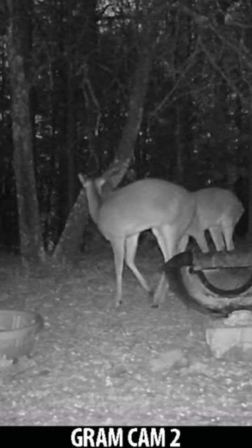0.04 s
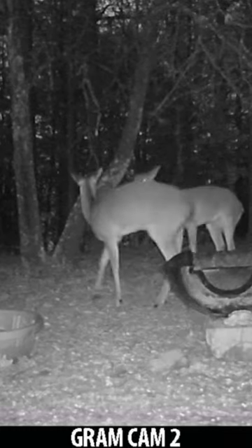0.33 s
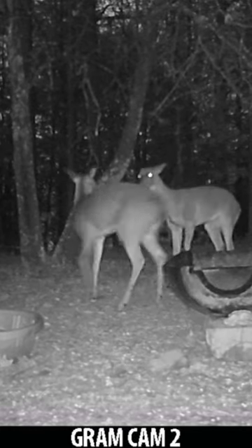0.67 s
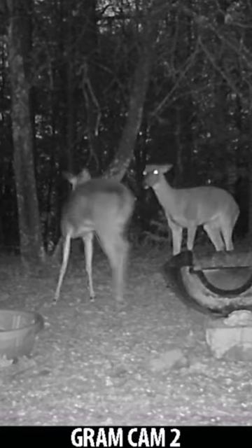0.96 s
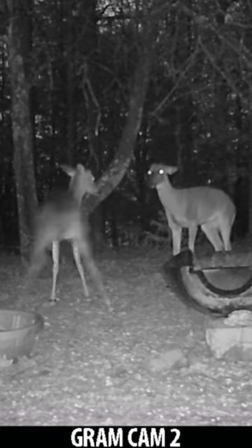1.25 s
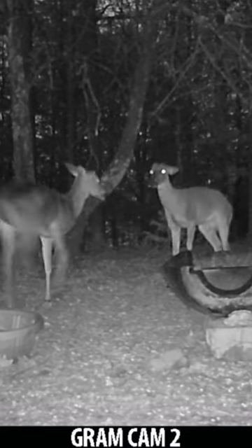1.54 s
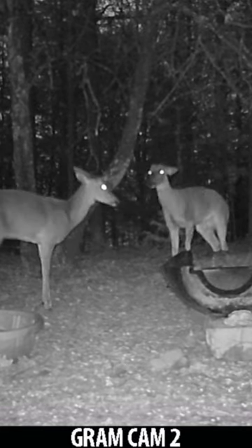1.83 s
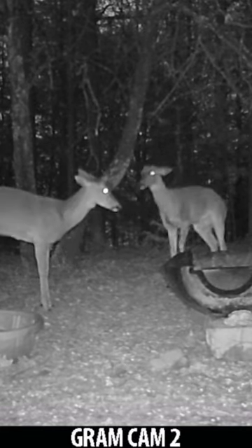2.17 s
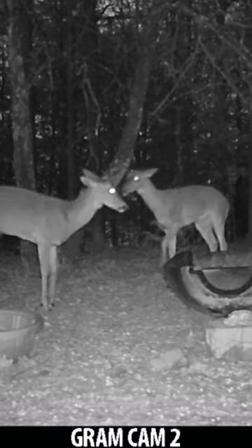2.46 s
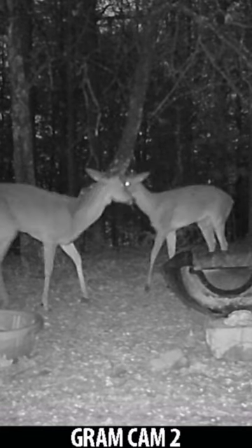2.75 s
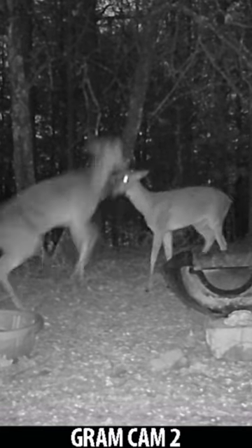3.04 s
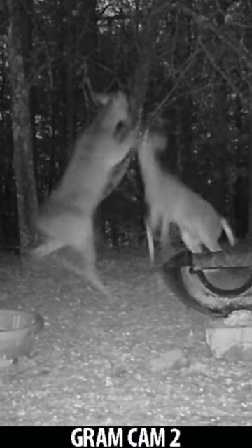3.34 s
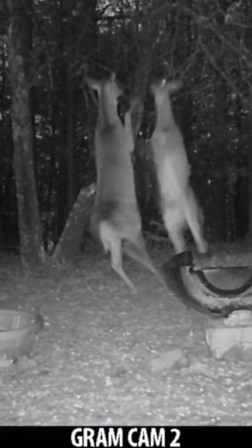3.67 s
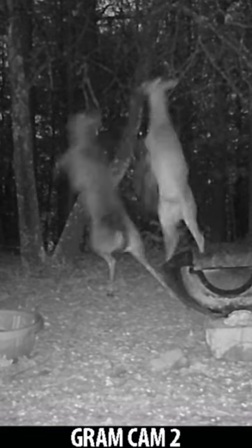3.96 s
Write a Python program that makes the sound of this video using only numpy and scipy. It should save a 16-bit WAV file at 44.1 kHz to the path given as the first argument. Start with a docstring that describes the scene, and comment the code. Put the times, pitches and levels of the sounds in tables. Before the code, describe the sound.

Two deer step about in the woods with dull hoof thumps, pause briefly, then move again. Leaf litter scuffs and twigs snap before their legs knock together in sharp clacks, over a quiet low rumble and thin hiss.

```python
"""Deer boxing at night

Two deer shuffle on leaf-strewn earth, then rear up and box with their front legs. Hooves thud on the
soft ground and scuff the litter; the blows excite damped resonances, sharp clacks that echo among the
trees. Behind them are a low rumble, a wavering drone, a faint flutter, and the hiss, whine and ticking
buzz of a small camera."""
import sys
import numpy as np
from scipy import signal
from scipy.fft import rfft, irfft
from scipy.io import wavfile

SR = 44100
rng = np.random.default_rng(int(sys.argv[2]) if len(sys.argv) > 2 else 0)


def int16_out(signal):
    """Quantize to a 16-bit WAV file."""
    q = np.round(np.clip(np.atleast_2d(signal).T, -1, 1) * 32767)
    wavfile.write(sys.argv[1], SR, q.astype(np.int16))


N = 176400
T = np.arange(N) / SR
TREBLE_ABOVE_HZ, BLOW_CUTOFF_HZ = 1700, 3700


def from_db(db):
    """Amplitude grows tenfold for every 20 dB."""
    return 10 ** (np.asarray(db) / 20)


def rms_one(x):
    """Normalisation to unit rms."""
    return x / np.sqrt(np.mean(x ** 2) + 1e-20)


def in_time(rows):
    """Linear interpolation of each column against the first, time."""
    s, *columns = np.transpose(rows)
    return [np.interp(T, s, c) for c in columns]


def lowpass(x, hz, order=2):
    """A Butterworth filter attenuates the treble."""
    return signal.sosfilt(signal.butter(order, min(hz, .45 * SR), fs=SR, output="sos"), x + 1e-18)


def noise():
    """White noise has a flat mean spectrum."""
    return rng.standard_normal(N)


def wander(hz):
    """Low-passed noise gives a random fluctuation of unit rms."""
    return rms_one(lowpass(noise(), hz))


def colour(x, spectrum):
    """Spectral shaping by rows of frequency in Hz and gain in dB, normalised to unit rms."""
    hz, db = np.transpose(spectrum)
    f = np.maximum(np.arange(N // 2 + 1) * SR / N, 1)
    gain = from_db(np.interp(np.log(f), np.log(hz), db))
    return rms_one(irfft(rfft(x) * gain, N))


def ring(x, hz, t60):
    """A damped resonator answers an impulse with a sine that falls 60 dB in t60 seconds."""
    r, w = np.exp(-np.log(1000) / (t60 * SR)), 2 * np.pi * hz / SR
    return signal.lfilter([0, np.sin(w)], [1, -2 * r * np.cos(w), r * r], x + 1e-18)


def click(s):
    """A unit impulse at s seconds."""
    return 1.0 * (np.arange(N) == int(s * SR))


def swell(s, rise, fall):
    """Exponential growth to 1 at s seconds, then exponential decay."""
    return np.exp(-np.minimum(np.maximum((s - T) / rise, (T - s) / fall), 20))


def rumble_and_hiss():
    """Stationary broadband noise: the night air rumbles and the camera hisses."""
    # Each row of both: frequency in Hz, relative level in dB.
    rumble = [(15, -3.5), (50, 2.5), (75, 0), (130, -10.5), (190, -13.5), (260, -17), (400, -31.5),
              (700, -32), (1500, -56)]
    hiss = [(300, -19), (800, 6), (1200, 1), (1700, -7.5), (2700, -2), (3400, -11.5), (4200, -16.5),
            (10000, -24), (15000, -34)]
    return from_db(-37.5) * colour(noise(), rumble) + from_db(-61.5) * colour(noise(), hiss)


def drone():
    """Random frequency and amplitude modulation make a low, distant tone waver."""
    # Each row: time in seconds, centre frequency in Hz, mean level in dB.
    course = [(0, 156.7, -39), (.38, 161.9, -34), (.55, 151.9, -63.5), (.85, 153.3, -33), (1.1, 155.6, -56),
              (1.33, 143, -29.5), (1.5, 125, -36.5), (1.75, 155.2, -42), (1.9, 138, -40),
              (2.0, 91.67, -50.5), (2.17, 99.9, -35.5), (2.4, 140, -42), (2.62, 155.2, -52),
              (2.85, 149.6, -39.5), (3.03, 154.5, -38), (3.3, 96.5, -37), (3.6, 150.5, -43.5),
              (4, 82.5, -71)]
    hz, db = in_time(course)
    hz = hz * (1 + .0488 * wander(17.4))
    return from_db(db + 2 * wander(13.5)) * np.sin(2 * np.pi * np.cumsum(hz) / SR)


def flutter():
    """Amplitude modulation by loosely periodic pulses breaks noise into faint, rasping puffs."""
    # Each row: time in seconds, mean pulses per second, level in dB.
    course = [(.45, 45.4, -67), (.85, 50.6, -61.5), (1.1, 76, -65), (1.62, 61, -56.5), (1.98, 43, -60.5),
              (2.15, 46, -69), (2.5, 50, -71.5), (2.8, 57, -64), (4, 50, -49)]
    rate, db = in_time(course)
    cycles = np.cumsum(rate * (1 + .13 * wander(25))) / SR
    decay_s = .0088
    puffs = np.exp(-(cycles % 1) / rate / decay_s)
    rasp = [(400, -60), (1250, 7), (1650, 0), (2100, 6), (3200, .5), (4200, -13.5), (15000, -47)]
    return from_db(db) * colour(noise() * puffs, rasp)


def whine():
    """A thin tone from the electronics climbs and settles; frequency jitter broadens its spectral line."""
    # Each row: time in seconds, centre frequency in Hz.
    glide = [(0, 13000), (.37, 13600), (.42, 14000), (.5, 14000), (1.05, 14400), (1.32, 15000),
             (2.0, 15000), (2.04, 15330), (2.1, 14890), (2.45, 15200)]
    hz, = in_time(glide)
    hz = hz + 80 * wander(20) + 145 * wander(400)
    return from_db(-70.5) * rms_one(np.sin(2 * np.pi * np.cumsum(hz) / SR))


def snaps():
    """Brittle fracture of single leaves and twigs releases brief broadband bursts."""
    # Each row: time in seconds, level in dB.
    breaks = [(.28, -52.5), (2.239, -48), (2.408, -46.5), (2.752, -48), (3.2294, -38), (3.282, -41),
              (3.4, -38), (3.638, -43), (3.686, -36.5)]
    # Each row: frequency in Hz, relative level in dB.
    spectrum = [(500, -1), (1600, 4.5), (3000, 1.5), (4500, -10), (7000, -19.5), (15000, -27)]
    return colour(noise(), spectrum) * sum(from_db(db) * swell(s, .00042, .0012) for s, db in breaks)


def scuffs():
    """Litter under a sliding hoof crackles as shot noise: loose leaves crisp, packed grit lower."""
    # Each row: peak time in seconds, level in dB, rise and fall in seconds, treble gain in dB.
    drags = [(0.409, -54.5, 0.031, 0.039, -0.5), (.6, -54.5, 0.016, 0.019, 5), (.985, -53.5, .017, 0.04, 3),
             (1.236, -44.5, 0.0072, 0.035, -1), (1.359, -47.5, 0.0018, 0.0075, 6.5),
             (1.396, -47, 0.0093, 0.029, 2.5), (2.667, -55.5, 0.016, 0.021, 5.5),
             (2.802, -44, 0.00068, 0.0064, -1.5), (2.84, -49, 0.03, 0.053, -3),
             (2.932, -45.5, 0.016, 0.048, -2.5), (3.155, -40, 0.0018, 0.014, 1.5),
             (3.188, -48.5, 0.0095, 0.029, 6), (3.244, -42, 0.013, 0.048, -3.5),
             (3.287, -42, 0.0042, 0.0065, 7.5), (3.365, -45.5, 0.0059, 0.0071, 0.5),
             (3.403, -48, 0.0099, .012, 5.5), (3.438, -26.5, .011, 0.0092, -3),
             (3.457, -43.5, 0.013, 0.057, -3), (3.592, -38.5, 0.0063, 0.021, -3),
             (3.637, -41.5, 0.0035, 0.024, 2.5), (3.689, -34.5, 0.0037, 0.0068, -15),
             (3.969, -40, 0.024, 0.061, -1.5)]
    # Each row: frequency in Hz, relative level in dB.
    litter = [(150, 6.5), (550, -12), (800, -4), (1100, 1), (1700, -4.5), (2200, 1), (2800, 0.5),
              (3500, -9), (4200, -17.5), (5500, -26.5), (15000, -52)]
    grains_per_s, spread_db = 5400, 3
    sizes = from_db(spread_db * np.minimum(rng.exponential(1, N), 4)) * rng.choice([-1, 1], N)
    grains = colour(sizes * (rng.random(N) < grains_per_s / SR), litter)
    grit = irfft(rfft(grains) * (np.arange(N // 2 + 1) * SR / N < TREBLE_ABOVE_HZ), N)
    leaves = grains - grit
    return sum(from_db(db) * swell(s, rise, fall) * (grit + from_db(crisp_db) * leaves)
               for s, db, rise, fall, crisp_db in drags)


def thuds():
    """A hoof compresses and releases soft earth; the shorter the pulse, the higher its spectrum."""
    # Each row: time in seconds, level in dB, characteristic frequency in Hz.
    footfalls = [(.571, -24.5, 203), (0.585, -19.5, 57), (.602, -14.5, 260), (0.605, -15.5, 63),
                 (0.6488, -23.5, 194), (.944, -12.5, 240), (0.948, -11, 244), (0.9632, -23, 145),
                 (0.982, -22, 225), (1.0112, -21, 146), (1.080, -12.5, 167), (1.1017, -27.5, 226),
                 (1.18, -17.5, 140), (1.193, -22.5, 144), (1.2828, -12.5, 152), (1.337, -17.5, 99),
                 (1.354, -18, 340), (1.358, -15.5, 250), (1.398, -19.5, 98), (1.4164, -10, 203),
                 (1.4246, -19.5, 189), (1.4349, -24.5, 218), (1.5328, -16, 122), (1.561, -21.5, 200),
                 (1.569, -15.5, 220.1), (1.6037, -17.5, 232.2), (2.277, -31.5, 140), (2.3692, -19, 148),
                 (2.465, -16.5, 102.8), (2.492, -26.5, 165), (2.539, -19.5, 53), (2.573, -17.5, 304),
                 (2.579, -10.5, 96), (2.6069, -19, 156), (2.6224, -21.5, 211.4), (2.636, -19, 111),
                 (2.671, -21, 140), (2.68, -18, 214), (2.6843, -16, 354), (2.7535, -15.5, 166),
                 (2.815, -26, 140), (2.8834, -18.5, 260), (2.894, -21, 283), (2.904, -21, 145),
                 (3.031, -19, 103), (3.0451, -18, 140), (3.3224, -21.5, 178), (3.337, -22, 166.1)]
    pulses, settling, shudder_power = np.zeros((3, N))
    settle_s = .014
    for s, db, hz in footfalls:
        u = (T - s) * np.pi * hz
        spread = 1 + u * u
        push = u * (4 - spread) / (spread * spread * spread)
        pulses += from_db(db) * lowpass(push, max(395, 2 * hz), order=3)  # sharp stamps are less muffled
        settling += from_db(db) * swell(s, settle_s / 3, settle_s)
        shudder_power += (from_db(db) * swell(s, .056, .097)) ** 2
    # Clods settle and the ground shudders with each step.
    clods = rms_one(lowpass(noise(), 285, order=3))
    shudder = colour(noise(), [(15, -15), (45, 0), (140, -2), (2000, -82)])
    return pulses + from_db(-20) * settling * clods + from_db(-18.5) * np.sqrt(shudder_power) * shudder


def ticking_buzz():
    """Narrow-band noise leaks from the electronics in faint periodic bursts."""
    first_s, period_s = .792, .8335
    bursts = sum(swell(s, .012, .012) for s in np.arange(first_s, T[-1], period_s))
    return from_db(-70) * bursts * rms_one(ring(noise(), hz=8900, t60=.006))


def creaks():
    """Stick-slip motion: a few evenly spaced slips each excite one high resonance."""
    # Each row: start in seconds, level in dB, resonance in Hz, number of slips.
    runs = [(1.696, -38.5, 3340, 2), (1.891, -43, 2010, 2), (3.739, -33, 2773, 5)]
    gap_s = .0113
    out = np.zeros(N)
    for s, db, hz, count in runs:
        slips = sum(click(s + k * gap_s) * from_db(rng.normal(0, 1.6)) for k in range(round(count)))
        out += from_db(db) * ring(slips, hz, t60=.014)
    return lowpass(out, BLOW_CUTOFF_HZ, order=8)


def clacks():
    """Impacts of legs and hooves excite heavily damped modes; hard blows favour the upper ones."""
    # Each row: time in seconds, level in dB, rattle decay in seconds, gain of the upper modes in dB.
    strikes = [(3.541, -17.5, 0.0072, 1.5), (3.546, -15.5, .0017, 15), (3.571, -14.5, 0.0035, -5),
               (3.722, -18, 0.0021, -0.5), (3.8119, -11, .006, -5), (3.8173, -15.5, .004, 21),
               (3.824, -22, 0.012, 2), (3.8691, -12.5, 0.0075, -2), (3.8776, -16.5, 0.0019, -17),
               (3.881, -1.5, 0.0023, 23), (3.894, -1, 0.002, 2), (3.9164, -20, 0.0017, 8)]
    # Each row: frequency in Hz, relative level in dB, time to fall 60 dB in seconds.
    modes = [(260, -49, 0.0099), (930, -11.5, 0.0066), (1187, 7.5, 0.0083), (2160, -3.5, 0.0044),
             (2600, 1, 0.0065)]
    out = np.zeros(N)
    for s, db, decay, hard_db in strikes:
        rattle = from_db(-18) * noise() * swell(s, .0001, decay)
        force = click(s) + rattle
        body = sum(from_db(level + hard_db * (hz > TREBLE_ABOVE_HZ)) * ring(force, hz, t60)
                   for hz, level, t60 in modes)
        bright_edge = from_db(-3) * lowpass(force, 6800)
        knock = lowpass(body / np.abs(body).max() + bright_edge, BLOW_CUTOFF_HZ, order=8)
        crack = from_db(-10.5) * lowpass(click(s), BLOW_CUTOFF_HZ)  # the first touch
        out += from_db(db) * (knock + crack)
    return signal.lfilter(*signal.iirnotch(540, Q=.8, fs=SR), out)  # hollows the low mids


def woods(x):
    """Scattering from trunks gives a thin reverberation that decays exponentially."""
    t60_s, delay_s = .18, .006
    tail = lowpass(noise(), 6900) * from_db(-60 * T / t60_s) * (T > delay_s)
    return from_db(-18.5) * signal.fftconvolve(x, tail / np.sqrt(np.sum(tail ** 2)))[:N]


def scene():
    """Superposition of the deer and the night background; only clacks and creaks reverberate."""
    blows = clacks() + creaks()
    background = rumble_and_hiss()
    deer = thuds() + scuffs() + snaps() + blows + woods(blows)
    return (deer + background + drone() + flutter() + whine() + ticking_buzz())[None]


def record(dry):
    """The microphone fades in, overload clips the hardest blows, and a low-pass limits the bandwidth."""
    wake_s, fade_s, cutoff_hz = .043, .0095, 16500
    fade_in = np.clip((T - wake_s) / fade_s + .5, .003, 1)
    clipped = np.clip(dry * fade_in, -.5, .5)
    return signal.sosfilt(signal.cheby2(16, 70, cutoff_hz, fs=SR, output="sos"), clipped)


dry = scene()
out = record(dry)
int16_out(out)
```